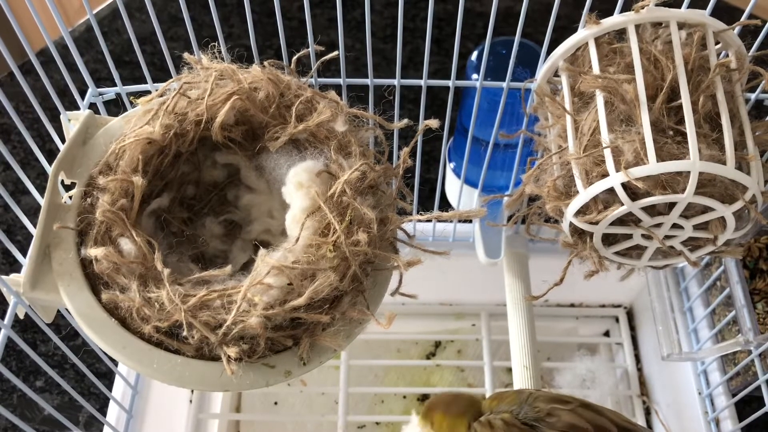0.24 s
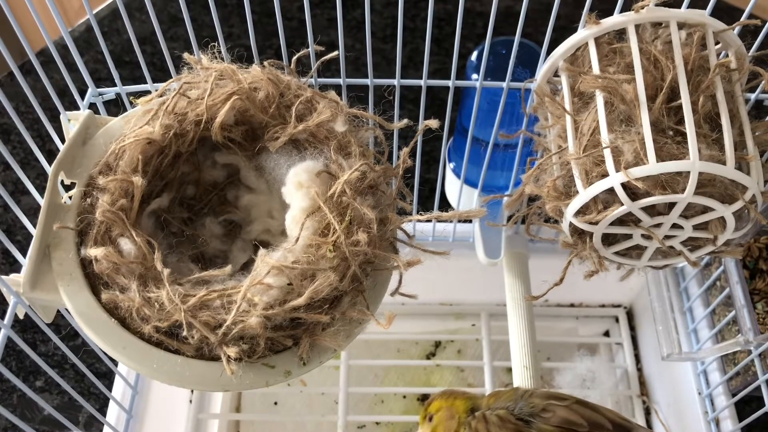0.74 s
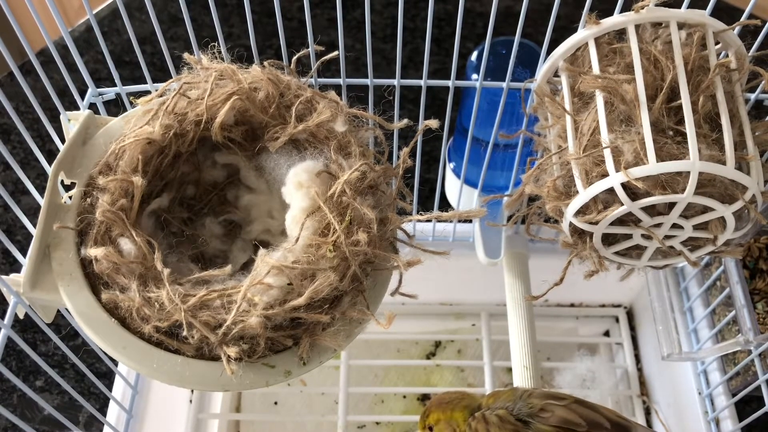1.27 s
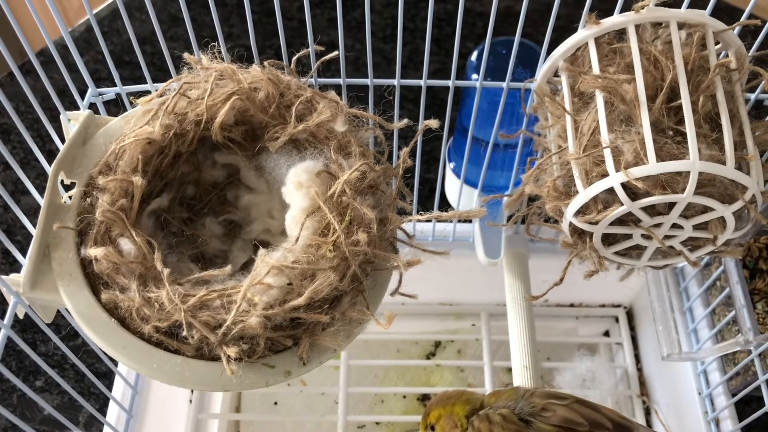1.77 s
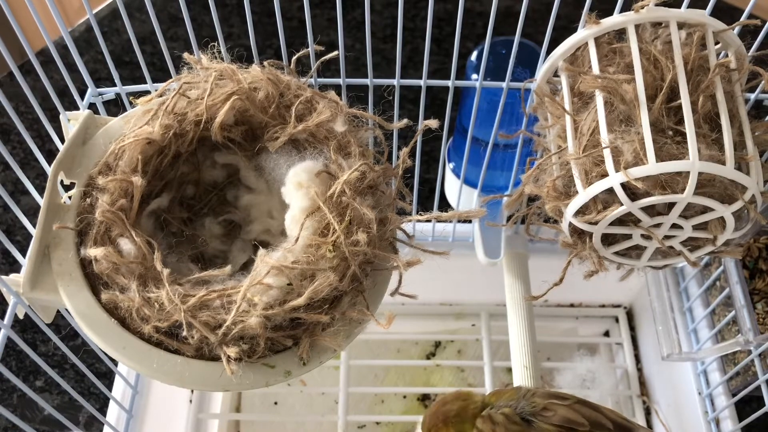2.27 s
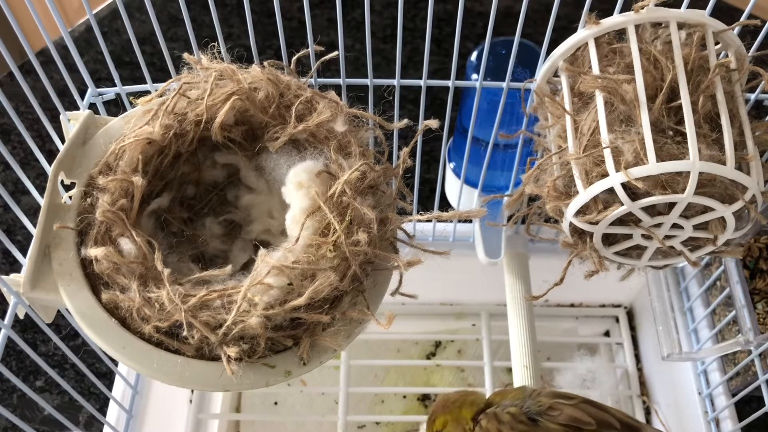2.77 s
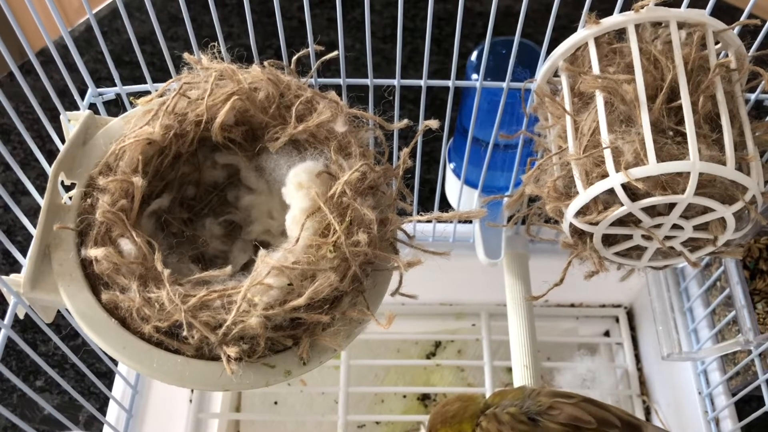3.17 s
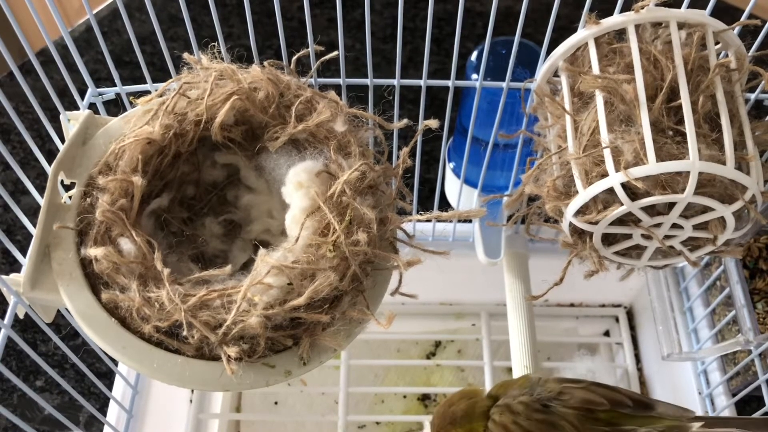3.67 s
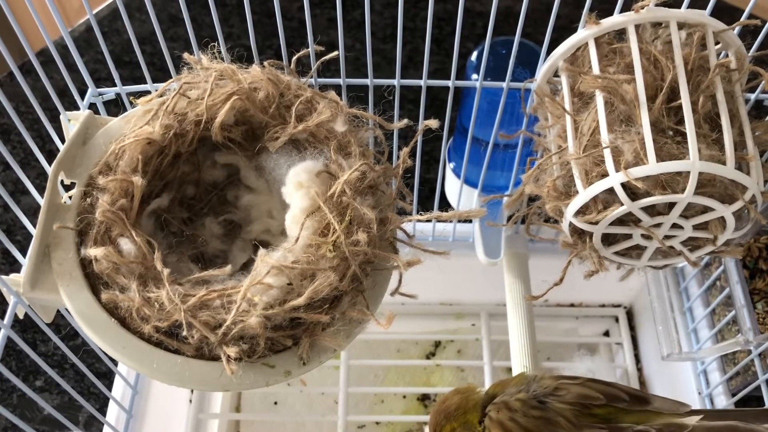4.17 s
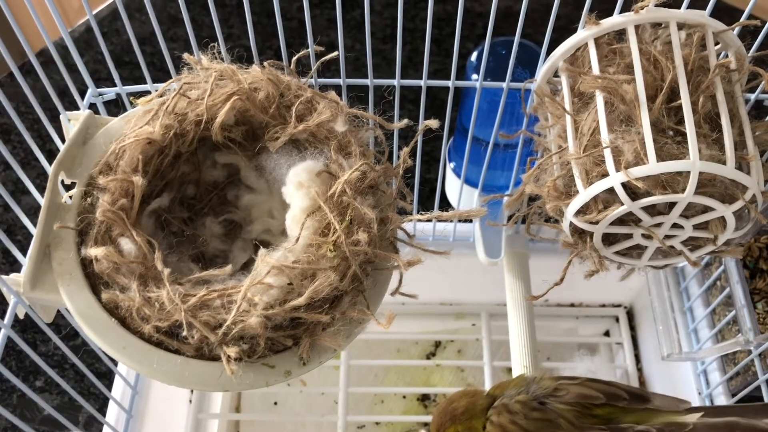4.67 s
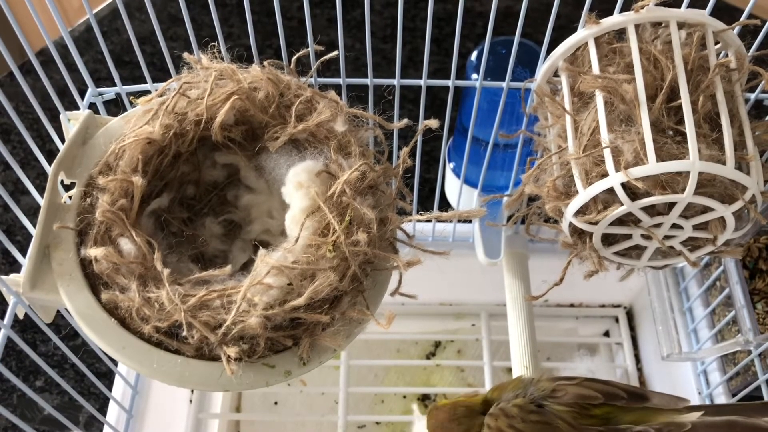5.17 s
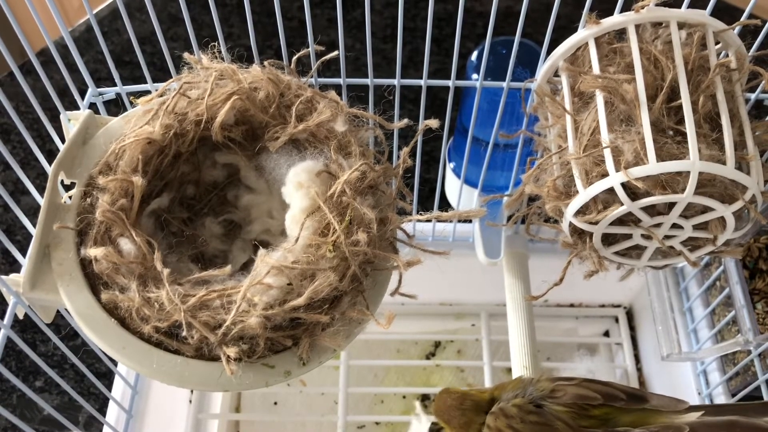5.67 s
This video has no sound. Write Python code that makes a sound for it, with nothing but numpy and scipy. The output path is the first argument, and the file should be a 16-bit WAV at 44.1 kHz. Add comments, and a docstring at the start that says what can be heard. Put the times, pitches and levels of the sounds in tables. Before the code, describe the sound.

Close, tiny bright clicks from a canary, followed by light ringing knocks and claw ticks on its wire cage over faint room hum.

```python
"""A canary close by in a wire cage makes a quick run of dry clicks, probably with its beak.
Each click is one tiny bright pulse with near echoes and a soft room tail. The bird fidgets as it goes;
then come a few knocks that ring the frame and wires, with sharp claw ticks and a short scrabble.
Under it all lies a quiet room: a faint hum, a brief gliding drone and a dull, distant stirring."""
import sys
import numpy as np
from scipy import signal
from scipy.fft import rfft, irfft
from scipy.io import wavfile

SR = 44100
rng = np.random.default_rng(int(sys.argv[2]) if len(sys.argv) > 2 else 0)


def pcm_store(signal):
    """Save signal as 16-bit PCM."""
    levels = np.round(np.clip(np.atleast_2d(signal), -1, 1) * 32767)
    wavfile.write(sys.argv[1], SR, levels.astype(np.int16).T)


N = 261513
TIME = np.arange(N) / SR

# knocks on the cage: start_s, clatter_db, frame_db, wire_db
CAGE_KNOCKS = [(1.904, -70, -65.5, -74), (3.059, -55, -76, -64), (3.12, -58, -74, -61),
               (4.394, -62, -65, -77.5), (4.496, -50, -63.5, -48.5), (4.54, -56, -55.5, -48),
               (4.7, -50.5, -49.5, -63), (4.739, -49, -57, -70), (4.820, -53, -57.5, -53.5),
               (4.886, -50.5, -54, -61), (5.031, -52.5, -51.5, -56), (5.057, -51, -53, -74),
               (5.080, -49.5, -55, -61), (5.173, -59, -60, -58), (5.543, -54.5, -58, -58.5)]
# ring of the frame and tray: pitch_hz, level_db, t60_s
FRAME_MODES = [(132.4, -6.5, 0.51), (163.4, -13, 1), (462, 2, 0.41), (495, -2.5, 0.4), (528.5, 1.5, 0.135),
               (700, -18, 0.19), (783, -4.5, 0.28), (894, -6, 0.2), (1094, -24, 0.24), (1107, -10.5, 0.24),
               (1456, -7, 0.14), (2535, -13.5, 0.094), (2810, -21, 0.15), (3710, -15, 0.04)]
# ring of the wire bars: pitch_hz, level_db, t60_s
WIRE_MODES = [(1165, -1.5, 0.45), (1198, -8, 0.51), (1226, -3, 0.48), (1230, -1.5, 0.51), (2470, -17, 0.29),
              (4000, -21, 0.25), (4080, -21, 0.27), (4070, -20.5, 0.39), (5930, -28, 0.13),
              (5980, -18, 0.19), (8600, -25.5, 0.14), (8470, -19, 0.114), (14200, -23, 0.14)]
# bright tone of a claw tick: frequency_hz, level_db
CLAW_COLOUR = [(500, -1), (1500, -4), (2600, -3), (4100, 1.5), (6000, 0), (7700, -8.5), (9000, -5),
               (12000, -11), (16000, -12.5)]
# low boom of the cage and the distance: frequency_hz, level_db
BOOM_COLOUR = [(60, -46), (85, -11), (140, 2), (200, -10.5), (270, -16.5), (400, -13.5), (600, -22),
               (1200, -49)]
# dull midrange rustle: frequency_hz, level_db
RUSTLE_COLOUR = [(250, 3.5), (480, 1.5), (650, 2.5), (1000, -6), (1230, -6), (1550, -14.5), (2500, -19.5),
                 (5000, -45)]


def from_db(db):
    """Decibels to gain."""
    return 10 ** (np.asarray(db) / 20)


def rms_one(x):
    """Scale to unit rms."""
    return x / np.sqrt(np.mean(x ** 2) + 1e-20)


def at_hz(points, hz):
    """Read a curve on a log-frequency axis."""
    f, value = np.transpose(points)
    return np.interp(np.log(np.maximum(hz, 1)), np.log(f), value)


def noise(colour, size=N):
    """Coloured noise, rms 1, rolling off below the lowest point."""
    hz = np.fft.rfftfreq(size, 1 / SR)
    gain = from_db(at_hz(colour, hz)) * np.minimum(hz / colour[0][0], 1) ** 2
    return rms_one(irfft(rfft(rng.standard_normal(size)) * gain, size))


def drift(rate_hz):
    """Smooth random wander, rms 1."""
    hz = np.fft.rfftfreq(N, 1 / SR)
    return rms_one(irfft(rfft(rng.standard_normal(N)) * np.exp(-(hz / rate_hz) ** 2), N))


def impulse(colour, size=1024):
    """The tightest pulse of a given colour (minimum phase), energy 1."""
    cepstrum = irfft(np.log(from_db(at_hz(colour, np.fft.rfftfreq(size, 1 / SR)))))
    fold = np.r_[1, np.full(size // 2 - 1, 2), 1, np.zeros(size // 2 - 1)]
    pulse = irfft(np.exp(rfft(cepstrum * fold)))
    return pulse / np.linalg.norm(pulse)


def dying(t60_s, size):
    """Decay that loses 60 dB in t60_s."""
    return np.exp(-np.log(1000) * TIME[:size] / t60_s)


def swell(start_s, length_s, attack_s, t60_s):
    """Envelope that rises, holds until its length is over, then dies away."""
    age = TIME - start_s
    release = np.exp(-np.log(1000) * np.maximum(age - length_s, 0) / t60_s)
    return np.clip(age / attack_s, 0, 1) * release


def add(out, start_s, sound):
    """Mix a sound in at start_s."""
    start = int(round(start_s * SR))
    out[start:start + len(sound)] += sound[:N - start]


def struck(modes, scatter_db=0, size=24000):
    """Ringing modes; scatter varies their strengths, as when each blow lands elsewhere."""
    hz, db, t60_s = np.transpose(modes)[:, :, None]
    strength = from_db(db + scatter_db * rng.standard_normal(hz.shape)) * rng.choice([-1, 1], hz.shape)
    return np.sum(strength * np.sin(2 * np.pi * hz * TIME[:size]) * dying(t60_s, size), axis=0)


def slips(per_s):
    """Tiny stick-slip jerks, uneven in timing and size; rms 1."""
    return rms_one((rng.random(N) < per_s / SR) * rng.uniform(0.64, 1, N) * rng.choice([-1, 1], N))


def background(air_db, rumble_db):
    """A bed of room tone and low rumble, with a dull stirring that ebbs and flows far off."""
    # level ride of the stirring: time_s, level_db
    stir_ride = [(0, -71.5), (1.3, -62.5), (1.85, -68.5), (2.7, -64), (4.2, -68), (5.93, -65.5)]
    # room tone: frequency_hz, level_db
    air_colour = [(50, 0.5), (80, -2), (150, -3), (280, -2.5), (420, -10), (650, -16), (1000, -20),
                  (2000, -28), (2900, -30), (3500, -25.5), (4300, -30.5), (9000, -33), (16000, -37.5)]
    rumble = from_db(rumble_db) * noise(BOOM_COLOUR)
    stir = from_db(np.interp(TIME, *np.transpose(stir_ride))) * noise(RUSTLE_COLOUR)
    return rumble + stir + from_db(air_db) * noise(air_colour)


def hum(waver, wander_rad):
    """Faint appliance hum, wavering in level and phase; its second tone swells once."""
    # hum tones: pitch_hz, level_db, drift_hz
    hum_tones = [(56.55, -67, 1.9), (240.6, -66, 2.7), (472.7, -74, 4), (595, -87, 6.3)]
    tones = []
    for hz, db, drift_hz in hum_tones:
        level = from_db(db) * (1 + waver * drift(drift_hz))
        phase = 2 * np.pi * hz * TIME + wander_rad * drift(drift_hz)
        tones.append(level * np.sqrt(2) * np.sin(phase))
    tones[1] *= 1 + from_db(6.5) * swell(start_s=3.42, length_s=0.2, attack_s=0.15, t60_s=0.76)
    return sum(tones)


def drone(peak_s, fade_s, pitch_hz, rise_hz_per_s, blur_hz, level_db):
    """A blurred low tone fades in and out far away, gliding upward."""
    age = TIME - peak_s
    phase = 2 * np.pi * np.cumsum(pitch_hz + rise_hz_per_s * age) / SR
    level = from_db(level_db) * np.exp(-(age / fade_s) ** 2)
    return level * (np.tanh(drift(blur_hz)) * np.sin(phase) + np.tanh(drift(blur_hz)) * np.cos(phase))


def room_tail(dry, colour, predelay_s, build_s, size=26000):
    """Diffuse reverb: a sound's energy returns as noise, each band dying at its own rate."""
    # decay of the room: frequency_hz, t60_s
    reverb_times = [(2000, 0.16), (5500, 0.5662), (10000, 0.3), (16000, 0.3852)]
    out, hz = np.zeros(N), np.fft.rfftfreq(N, 1 / SR)
    diffuse = rfft(noise(colour))
    arrival = np.clip((TIME[:size] - predelay_s) / build_s, 0, 1)
    edges_hz = [300, 2000, 4000, 6000, 8000, 11000, 14000, 18000]
    for low, high in zip(edges_hz, edges_hz[1:]):
        decay = (arrival * dying(at_hz(reverb_times, np.sqrt(low * high)), size)) ** 2
        energy = signal.fftconvolve(dry ** 2, decay / decay.sum())[:N]
        out += np.sqrt(np.abs(energy)) * irfft(diffuse * (hz >= low) * (hz < high), N)
    return out


def fidgeting(attack_s, t60_s):
    """Three envelopes: how hard the feet scuff, jog the cage and rub the bars."""
    # spells of fidgeting: start_s, length_s, scuff_db, jog_db, rub_db
    spells = [(.45, 0.11, -68, -71, -84), (0.657, 0.081, -78, -61.5, -76), (1.218, 0.44, -78.5, -64, -71.5),
              (1.897, 0.71, -69.5, -59.5, -82), (2.587, 0.77, -64.5, -60, -72),
              (3.668, 0.14, -75, -59, -81), (4.435, 0.1, -69, -61.5, -61)]
    power = sum(np.outer(from_db(levels_db), swell(start_s, length_s, attack_s, t60_s)) ** 2
                for start_s, length_s, *levels_db in spells)
    return np.sqrt(power)


def squeak(level_db):
    """Light rubbing sings in a few broad resonances, starting just before the first click."""
    # squeak resonances: pitch_hz, level_db, t60_s
    squeak_modes = [(1670, -2, 0.032), (2900, -13, 0.013), (3360, -1, .02), (4230, -4, 0.015),
                    (5030, -3, .01)]
    rub = signal.fftconvolve(rng.standard_normal(N), struck(squeak_modes, scatter_db=3))[:N]
    envelope = swell(start_s=0.418, length_s=0.12, attack_s=0.045, t60_s=2.2)
    return from_db(level_db) * envelope * rms_one(rub)


def singing_bars(rub, size=24000):
    """Light continuous rubbing keeps the wires sounding."""
    friction = rng.standard_normal(N + size)
    ring = signal.fftconvolve(friction, struck(WIRE_MODES, size=size), mode="valid")[:N]
    return rub * rms_one(ring)


def scuffing(scuff, grains_per_s, frame_db, uneven_db):
    """The feet change grip in soft, scratchy spurts that also stir the frame."""
    # soft tone of a scuff: frequency_hz, level_db
    scuff_colour = [(250, -1), (500, 5), (1200, 0.5), (2000, -2), (4000, -4), (8000, -12), (16000, -23)]
    spurts = from_db(uneven_db * np.clip(drift(rate_hz=90), -2, 2))
    jerks = slips(grains_per_s) * spurts
    scratch = rms_one(signal.fftconvolve(jerks, impulse(scuff_colour))[:N])
    body = rms_one(signal.fftconvolve(jerks, struck(FRAME_MODES))[:N])
    return scuff * (scratch + from_db(frame_db) * body)


def cage_rumble(jog, boom_db, rustle_db, attack_s, t60_s):
    """The cage rumbles while the bird jogs it, and booms and rustles on after each knock."""
    shake = np.sqrt(sum((from_db(clatter_db) * swell(start_s, attack_s, attack_s, t60_s)) ** 2
                        for start_s, clatter_db, *_ in CAGE_KNOCKS))
    boom = np.hypot(jog, from_db(boom_db) * shake) * noise(BOOM_COLOUR)
    return boom + from_db(rustle_db) * shake * noise(RUSTLE_COLOUR)


def loaded(modes, detune):
    """The bird's weight and grip retune each mode a little at every blow."""
    return [(hz * (1 + detune * rng.standard_normal()), db, t60_s) for hz, db, t60_s in modes]


def cage_knocks(clatter_t60_s, size=24000):
    """Each knock shakes loose parts into a short clatter and rings the frame and bars."""
    # bass-heavy clatter: frequency_hz, level_db
    clatter_colour = [(60, 3.5), (140, 8), (300, 0.5), (500, -6), (900, -1.5), (1400, -7), (2000, -13),
                      (4000, -20), (8000, -29), (16000, -44)]
    out = np.zeros(N)
    for start_s, clatter_db, frame_db, wire_db in CAGE_KNOCKS:
        add(out, start_s, from_db(clatter_db) * noise(clatter_colour, size) * dying(clatter_t60_s, size))
        add(out, start_s, from_db(frame_db) * struck(loaded(FRAME_MODES, detune=0.016), scatter_db=4))
        add(out, start_s, from_db(wire_db) * struck(loaded(WIRE_MODES, detune=0.015)))
    return out


def stray_ticks(scuff, per_s, gain_db, t60_s, size=1024):
    """Fainter claw ticks at random moments, riding the level of the scuffing."""
    touches = (rng.random(N) < per_s / SR) * scuff
    tick = noise(CLAW_COLOUR, size) * dying(t60_s, size)
    return from_db(gain_db) * signal.fftconvolve(touches, tick)[:N]


def scrabble(grains_per_s, level_db):
    """The claws skid once in a dense spray of slips."""
    scrape = signal.fftconvolve(slips(grains_per_s), impulse(CLAW_COLOUR))[:N]
    envelope = swell(start_s=5.029, length_s=0.056, attack_s=0.0047, t60_s=0.025)
    return from_db(level_db) * envelope * scrape


def claw_ticks(t60_s, size=1024):
    """Claws tap perch and wire: tiny noise bursts, each with its own brightness."""
    # the clearest taps: start_s, level_db, tilt_db_per_octave
    taps = [(2.238, -46.5, 2), (2.288, -44, 6.5), (2.537, -44, -2.5), (2.640, -41.5, 2), (2.694, -47, -1.5),
            (2.797, -44, 3), (3.120, -44.5, 0.5), (3.297, -50, -3.5), (4.393, -52, 6), (4.701, -40, -3.5),
            (4.7246, -40.5, 3), (4.886, -39.5, 2), (5.031, -40.5, 0), (5.035, -39.5, -2.5),
            (5.079, -37.5, 2), (5.091, -43, 1), (5.188, -47.5, -2), (5.293, -52.5, -2)]
    out = np.zeros(N)
    for start_s, db, tilt in taps:
        colour = [(hz, level + tilt * np.log2(hz)) for hz, level in CLAW_COLOUR]
        add(out, start_s, from_db(db) * noise(colour, size) * dying(t60_s, size))
    return out


def beak_clicks(trim_db, sink_per_s, stretch_per_s, jitter, splash_db, splash_t60_s, size=1024):
    """One tiny pulse a click; as the head turns, its colour sinks and its near echoes come later."""
    # about nine clicks a second with one pause, growing louder: start_s, level_db
    clicks = [(0.5255, -9.5), (0.6364, -9.5), (0.7492, -9), (0.8696, -10), (0.9783, -14.5), (1.0003, -10),
              (1.1287, -10.5), (1.5363, -8.5), (1.6399, -9.5), (1.7465, -10), (1.8561, -9), (1.964, -8),
              (2.0754, -8), (2.1656, -8), (2.2995, -7.5), (2.3917, -7), (2.4936, -8), (2.6042, -7.5),
              (2.7116, -7), (2.8304, -8), (2.9527, -7.5), (3.0776, -7), (3.2007, -7), (3.3318, -6.5),
              (3.445, -7), (3.557, -6.5), (3.6562, -5.5), (3.7738, -6.5), (3.896, -7), (4.0111, -7.5),
              (4.1214, -5), (4.2412, -7)]
    # bright tone of a click: frequency_hz, level_db
    click_colour = [(400, -54.5), (1300, -31), (2400, -17), (2950, -25), (3500, -7.5), (4300, -5),
                    (5100, -12.5), (5600, -3), (7300, -6.5), (8200, -1), (10500, -1.5), (12000, 0.5),
                    (15000, -2.5), (17000, -7.5)]
    # echoes off edges right beside the head: delay_ms, level_db
    near_echoes = [(.54, -10), (.95, -20), (1.45, -18), (2.03, -21)]
    out, khz = np.zeros(N), np.fft.rfftfreq(size, 1000 / SR)
    delay_ms, echo_db = np.transpose(near_echoes)
    middle_s = np.mean([start_s for start_s, _ in clicks])
    after_echo = TIME[:size] > delay_ms[0] / 1000
    for start_s, db in clicks:
        offset_s = start_s - middle_s
        colour = [(hz * (1 - sink_per_s * offset_s), level) for hz, level in click_colour]
        pulse = rfft(impulse(colour, size))
        paths_ms = delay_ms * (1 + stretch_per_s * offset_s + jitter * rng.standard_normal(len(delay_ms)))
        # the edges send the pulse back inverted; the bars scatter it into a splash
        echoes = -from_db(echo_db) @ np.exp(-2j * np.pi * np.outer(paths_ms, khz))
        splash = rng.standard_normal(size) * dying(splash_t60_s, size) * after_echo
        echoes += from_db(splash_db) * rfft(splash / np.linalg.norm(splash))
        add(out, start_s, from_db(db + trim_db) * irfft(pulse * (1 + echoes)))
    return out


def scene():
    """Close, nearly dry clicks over the cage and the room bed; clicks and claws get a soft tail."""
    # airy tone of the clicks' reverb: frequency_hz, level_db
    tail_colour = [(1000, -10), (2000, -7.5), (3200, 0), (4500, 4), (6000, 6.5), (9000, 4.5), (13000, 6.5),
                   (16000, -1)]
    scuff, jog, rub = fidgeting(attack_s=0.047, t60_s=1)
    clicks = beak_clicks(trim_db=-0.5, sink_per_s=0.022, stretch_per_s=0.012, jitter=0.006,
                         splash_db=-17, splash_t60_s=0.01)
    feet = claw_ticks(t60_s=0.01) + scrabble(grains_per_s=2700, level_db=-55)
    feet += stray_ticks(scuff, per_s=16, gain_db=8.5, t60_s=0.01)
    fidget = scuffing(scuff, grains_per_s=2500, frame_db=-3.5, uneven_db=7)
    fidget += squeak(level_db=-69.5) + singing_bars(rub)
    cage = cage_knocks(clatter_t60_s=0.37)
    cage += cage_rumble(jog, boom_db=-14, rustle_db=-12, attack_s=0.048, t60_s=1.06)
    tails = from_db(-18) * room_tail(clicks, tail_colour, predelay_s=0.0011, build_s=0.0083)
    tails += from_db(-10) * room_tail(feet, CLAW_COLOUR, predelay_s=0.0014, build_s=0.0014)
    bed = background(air_db=-62, rumble_db=-72.5) + hum(waver=0.26, wander_rad=0.75)
    bed += drone(peak_s=1.36, fade_s=0.29, pitch_hz=335.6, rise_hz_per_s=180, blur_hz=34, level_db=-57)
    return (bed + tails + fidget + cage + feet + clicks)[None]


def record(dry):
    """The microphone drops the deepest bass; the top is cut steeply."""
    low_cut_hz, high_cut_hz = 47, 16400
    thin = signal.sosfilt(signal.butter(6, low_cut_hz, "high", fs=SR, output="sos"), dry)
    high_cut = signal.firwin(241, high_cut_hz, window="blackman", fs=SR)
    return signal.fftconvolve(thin, high_cut[None], mode="same")


dry = scene()
out = record(dry)
pcm_store(out)
```